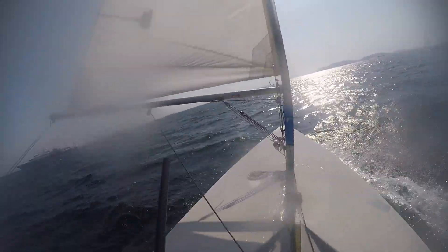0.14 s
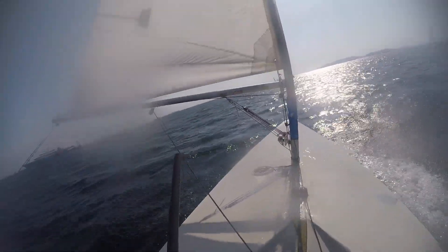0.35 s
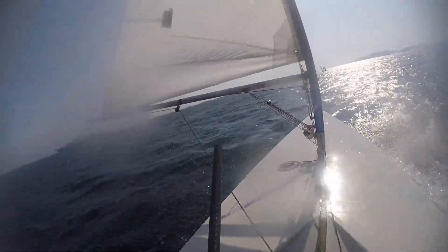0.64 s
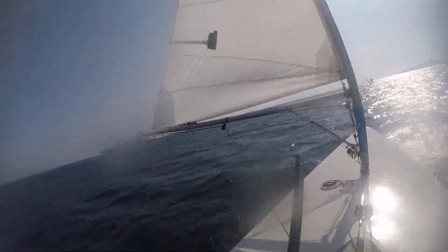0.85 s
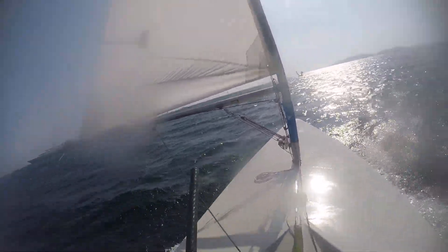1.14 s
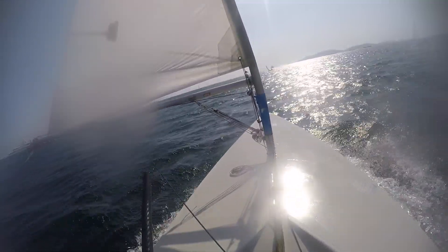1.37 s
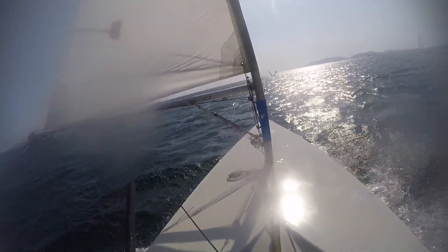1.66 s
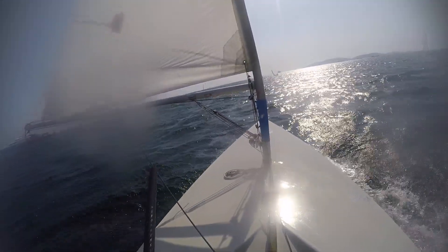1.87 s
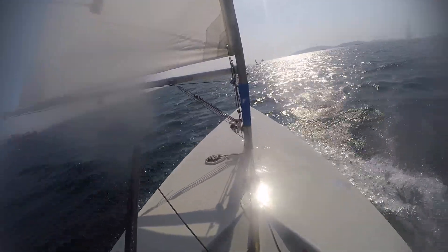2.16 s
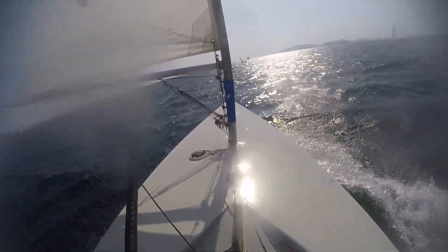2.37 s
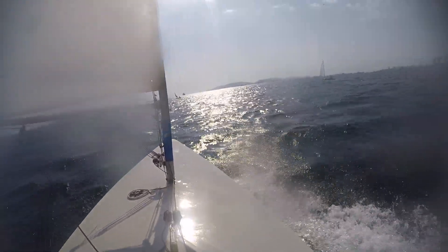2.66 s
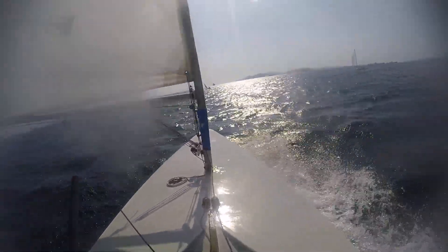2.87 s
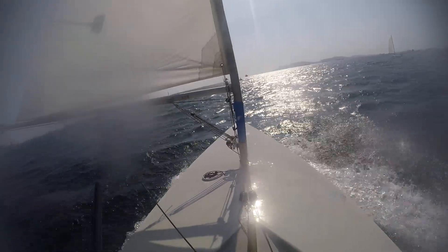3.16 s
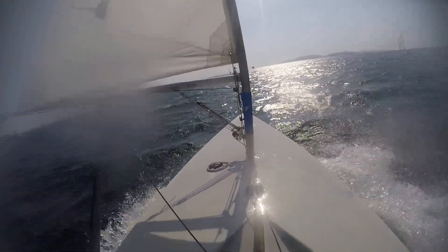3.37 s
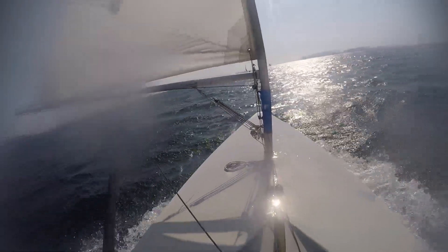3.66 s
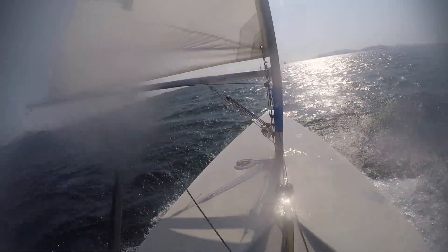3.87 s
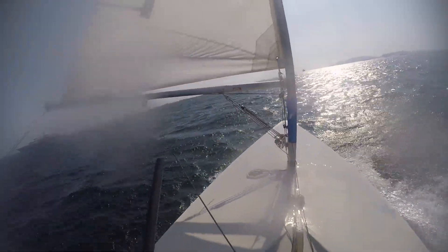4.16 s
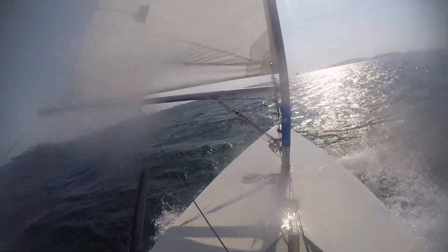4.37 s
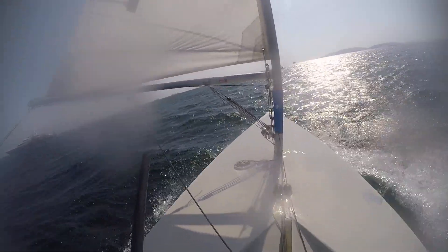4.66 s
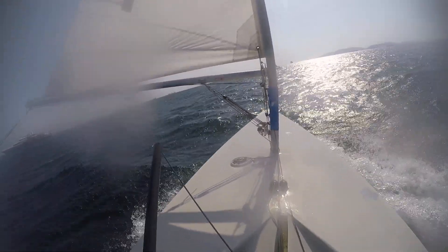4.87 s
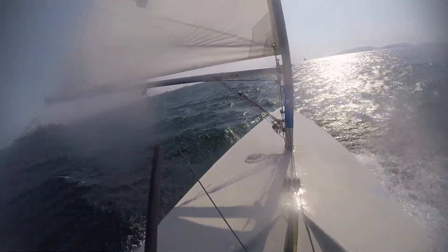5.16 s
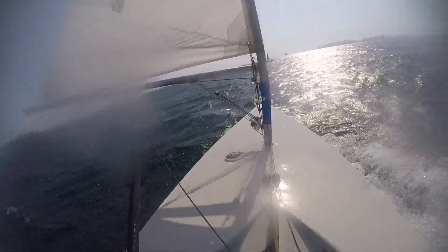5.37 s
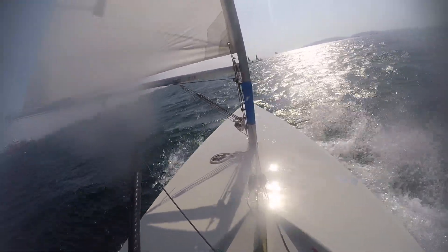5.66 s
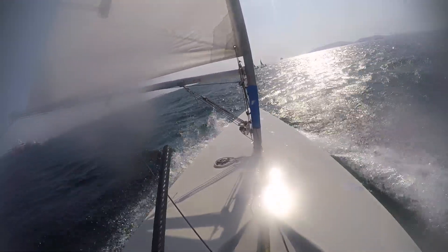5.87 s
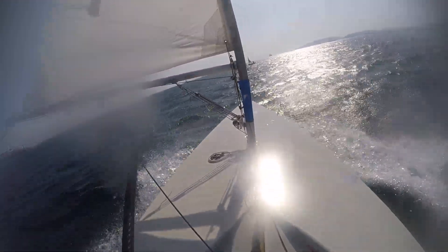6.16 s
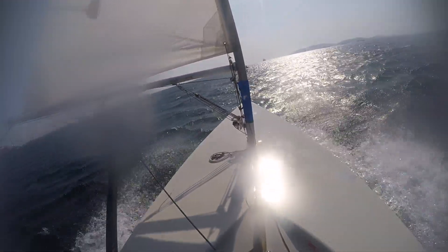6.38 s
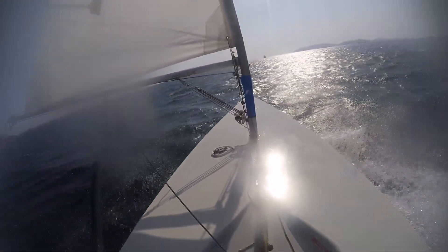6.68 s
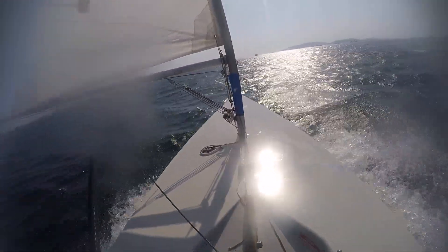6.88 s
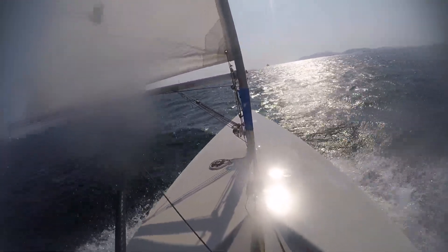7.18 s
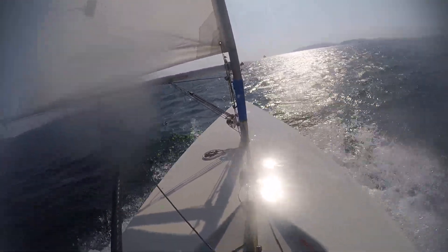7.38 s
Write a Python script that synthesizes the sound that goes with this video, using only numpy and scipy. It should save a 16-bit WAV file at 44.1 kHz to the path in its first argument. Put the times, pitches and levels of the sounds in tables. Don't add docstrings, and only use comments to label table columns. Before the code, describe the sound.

On the deck of a small sailing boat in strong wind, a ratchet block clicks rapidly for the first third of a second. Bow wave and spray then hiss on continuously, dipping around one second and swelling after three, over low drumming and gurgling at the hull. Gusts thump deeply against the microphone's sealed case, which gives the water a boxy, resonant colour, and scattered drops tick on it.

```python
import sys
import numpy as np
from scipy import signal
from scipy.fft import rfft, irfft, next_fast_len
from scipy.io import wavfile
from scipy.ndimage import uniform_filter1d

SR = 44100
rng = np.random.default_rng(int(sys.argv[2]) if len(sys.argv) > 2 else 0)


def unload_wav(signal):
    wavfile.write(
        sys.argv[1],
        SR,
        np.round(np.clip(np.atleast_2d(signal).T, -1, 1) * 32767).astype(np.int16),
    )


def to_linear_factor(level_db):
    exponent = np.asarray(level_db, float) / 20
    return 10 ** exponent


N = 332073
TIME = np.arange(N) / SR
FREQ = np.fft.rfftfreq(next_fast_len(N), 1 / SR) + 1e-3
STEPS = np.arange(0, N + 64, 64) / SR


def unit(x):
    return x / np.sqrt(np.mean(x ** 2))


def colour(x, gain):
    size = next_fast_len(N)
    return irfft(rfft(x, size) * gain, size)[..., :N]


def shape(table):
    hz, db = np.transpose(table)
    return to_linear_factor(np.interp(np.log(FREQ), np.log(hz), db))


def above(hz):
    return 1 / (1 + (hz / FREQ) ** 10)


def walk(rate):
    hold = max(int(SR / rate), 1)
    levels = np.repeat(rng.standard_normal(N // hold + 1), hold)
    return unit(uniform_filter1d(levels, hold)[:N])


def curves(table):
    s, *cols = np.transpose(table)
    return [np.interp(TIME, s, c) for c in cols]


def bumps(times, size, half_s):
    bells = np.exp(-((STEPS[:, None] - times) / half_s) ** 2)
    return np.interp(TIME, STEPS, bells @ size)


def spikes(times, size):
    x = np.zeros(N)
    at = (np.asarray(times) * SR).astype(int).clip(0, N - 1)
    np.add.at(x, at, size)
    return x


def ring(x, hz, t60):
    pole = np.exp(2j * np.pi * hz / SR - np.log(1000) / (t60 * SR))
    return signal.lfilter([1], [1, -pole], x).imag


def burst(times, db, length_s):
    tail = np.exp(-np.arange(400) / (length_s * SR))
    return np.convolve(spikes(times, to_linear_factor(db)), tail)[:N] * rng.standard_normal(N)


def pings(times, db, hz, length_s):
    after = np.arange(600) / SR
    swell = np.e * after / length_s * np.exp(-after / length_s)
    out = np.zeros(N)
    for t, gain, f in zip(times, to_linear_factor(db), hz):
        start = int(t * SR)
        out[start:start + len(after)] += gain * swell * np.sin(2 * np.pi * f * after)
    return out


def froth(grain_db, flicker_db, shared):
    level = grain_db * walk(900) + flicker_db * walk(25) + shared
    return rng.standard_normal(N) * to_linear_factor(level)


def level_db(hz, db, slope):
    # time in seconds, change of the foam in dB.
    speed = [(0.0, -0.1), (0.3, -3), (0.62, -3), (1.03, -6.5), (1.47, -1.3), (2.15, -2.7), (2.6, -1.0),
             (3.0, -0.5), (3.25, 1.2), (3.9, 2.5), (4.35, 0.4), (4.8, 1.6), (5.2, 1.2), (5.9, 2.5),
             (6.3, 2.5), (6.75, -0.1), (7.2, 2.5), (7.53, -0.2)]
    # time in seconds, half length in seconds,
    # lift (or hush) in dB, pitch in Hz.
    waves = [(0.726, 0.09, -4, 230), (1.04, 0.15, 3.5, 140), (1.31, 0.1, -4.2, 550), (1.55, 0.09, -3, 230),
             (2.367, 0.11, 4, 800), (2.666, 0.07, 2.0, 550), (3.07, 0.09, 1.5, 370), (3.39, 0.05, 3.5, 140),
             (3.51, 0.13, 1.5, 1200), (3.97, 0.024, 3, 550), (4.34, 0.09, 2.5, 1200),
             (4.46, 0.16, 2.5, 550), (4.71, 0.21, 2.5, 139), (5.506, 0.05, 3.5, 140),
             (5.78, 0.09, 2.6, 140), (6.38, 0.17, 3.2, 800), (6.516, 0.037, -3, 900),
             (6.692, 0.19, 2.5, 800), (6.91, 0.09, -1.5, 230), (7.153, 0.03, 7, 230)]
    sheets = [(0.43, 0.05, -2.1, 11500), (0.576, 0.05, 2, 3400), (0.87, 0.054, 3.5, 1800),
              (1.22, 0.05, 2, 8000), (1.485, 0.026, 3.3, 2500), (1.61, 0.05, -3, 5500),
              (1.843, 0.062, 3, 1800), (1.84, 0.05, 3.5, 11500), (2.15, 0.026, 2.5, 3400),
              (2.333, 0.05, 3, 3400), (2.53, 0.05, 1, 2500), (2.7, 0.22, 0.5, 10000),
              (2.763, 0.026, 2.5, 1800), (3.14, 0.22, 2.5, 11500), (3.444, 0.1, -1, 8000),
              (3.973, 0.068, 2.5, 2500), (4.2, 0.054, 4, 11500), (4.47, 0.054, 2.5, 8000),
              (4.465, 0.044, 4.5, 1800), (4.74, 0.1, 2, 11500), (4.82, 0.058, 1.8, 3400),
              (5.574, 0.036, 3, 5500), (5.75, 0.046, 1, 2500), (5.93, 0.1, 1, 11500),
              (6.124, 0.079, -3.5, 11500), (6.417, 0.15, 1.5, 3400), (6.5, 0.05, 1.5, 11500),
              (6.9, 0.15, 2.8, 11500), (7.446, 0.07, 6, 8000)]
    reach_octaves, force = 1.01, 0.96
    s, half_s, wave_db, wave_hz = np.transpose(waves + sheets)
    near = np.exp(-(np.log2(hz / wave_hz) / reach_octaves) ** 2)
    return db + slope * curves(speed)[0] + bumps(s, force * wave_db * near, half_s)


def case_gain():
    # resonance in Hz, width in Hz, level in dB.
    resonances = [(1054, 110, -12.5), (1198, 97, -14.5), (1551, 297, -3.5), (1848, 315, -1),
                  (2287, 560, -7), (2920, 200, -5.5), (3290, 630, 0.5), (3774, 630, -1), (4297, 100, -7),
                  (5030, 690, -8.5), (5460, 430, -10.5), (6020, 590, -10), (7000, 550, -21),
                  (7890, 820, -20), (8980, 1000, -19.5), (10230, 1300, -26.5), (11800, 500, -28),
                  (12700, 1200, -26), (13900, 1500, -30), (15100, 900, -28.5)]
    power = sum(to_linear_factor(db) ** 2 / (1 + (2 * (FREQ - hz) / w) ** 2) ** 2 for hz, w, db in resonances)
    return np.sqrt(power)


def wind():
    # time in seconds, buffet level in dB.
    gusts = [(0.0, -34), (0.84, -43.5), (1.67, -43), (2.51, -36), (3.35, -36.0), (4.18, -29.5), (5.02, -40),
             (5.86, -35.0), (6.69, -43), (7.53, -41.5)]
    # time in seconds, rise in dB.
    thumps = [(0.27, 4), (0.46, 2.5), (0.84, 4.6), (0.93, 12), (1.07, 8.5), (1.17, 9), (1.31, 5),
              (1.51, 11), (1.64, 8), (1.77, 7), (1.95, 6), (2.05, 11), (2.33, 8), (2.63, 10), (2.89, 11),
              (3.04, 6), (3.35, 3), (3.42, 3), (3.9, 1.5), (4.42, 2.5), (4.91, 0), (4.99, 2.5), (5.37, 6.2),
              (6.19, 0.5), (6.55, 4.5), (6.75, 9), (6.89, 8), (7.31, 5.7), (7.45, 5.1)]
    # time in seconds, change of level in dB.
    lulls = [(0.04, -10.9), (0.37, -16), (0.59, -7), (1.23, -7.2), (1.99, -5), (2.16, -9), (2.43, -5.2),
             (2.73, -4), (3.12, -2), (3.56, -11), (3.65, -7), (3.73, -14), (3.84, -14), (4.04, -5.5),
             (4.27, -8), (4.35, -19), (4.47, -5), (4.76, -5.6), (4.83, -18), (5.05, -14), (5.13, -6),
             (5.68, -14), (5.81, -14), (5.93, -10), (6.01, -3), (6.09, -6), (6.31, -7.8), (6.59, -2)]
    # frequency in Hz, level in dB per Hz.
    buffet = [(5.9, -42), (10, 6), (22, -3), (38, 4.5), (51, -2.5), (75, -26), (98, -59), (160, -120)]
    thump_s, lull_s = 0.027, 0.034
    eddy_hz, eddy_hz_per_db = 30.8, 0.32
    gust_db = curves(gusts)[0]
    rate = eddy_hz + eddy_hz_per_db * (gust_db + 36) + 0.907 * walk(5.4)
    gust_db = gust_db + bumps(*np.transpose(thumps), thump_s) + bumps(*np.transpose(lulls), lull_s)
    turns = np.cumsum(rate * (1.02 + 0.1406 * walk(40))) / SR
    eddies = np.sin(2 * np.pi * turns) + 0.67 * unit(colour(rng.standard_normal(N), shape(buffet)))
    size = uniform_filter1d(eddies ** 2, int(0.077 * SR))
    size = uniform_filter1d(size, int(0.019 * SR))
    pressure = eddies / np.sqrt(size + 0.24) * to_linear_factor(gust_db + 0.96 * walk(15) + 1.5)
    return colour(pressure, 1 - above(75.0))


def hull():
    # frequency in Hz, level in dB per Hz.
    skin = [(38, -40), (65, -3.5), (92, -11), (214, -16.5), (545, -18.5), (1000, -19), (1300, -65),
            (2200, -120)]
    # time in seconds, half length in seconds, pitch in Hz, level in dB.
    slaps = [
        (3.352, 0.051, 681, -52.5),
        (3.965, 0.027, 483, -59),
        (6.349, 0.09, 855, -57),
    ]
    surge = walk(30)
    body = shape(skin)
    drum = colour(froth(0.44, 0.45, 0.54 * surge), body * (1 - above(246.0)))
    wash = colour(froth(0.84, 0.28, 0.91 * surge), body * (above(224.0) - above(560.0)))
    gurgle = colour(froth(1.7, 0.53, 0.83 * surge), body * above(486.0))
    out = unit(drum) * to_linear_factor(level_db(140, -57, 0.55) + 2.3)
    out = out + unit(wash) * to_linear_factor(level_db(390, -60, 0.37) + 0.4)
    out = out + unit(gurgle) * to_linear_factor(level_db(630, -59, 0.48) + 0.2)
    for s, half_s, hz, db in slaps:
        hollow = colour(froth(2.3, 1.6, 0), 1 / (1 + ((FREQ - hz) / (0.31 * hz)) ** 2))
        out = out + unit(hollow) * to_linear_factor(db) * np.exp(-((TIME - s) / half_s) ** 2)
    return out


def water():
    splash = 0.5 * walk(70) + 0.5 * walk(22) + 1.0 * walk(300)
    case = case_gain()
    bow = colour(froth(0.55, 0.28, 0.72 * splash), case * (1 - above(2183.0)))
    foam = colour(froth(1.23, 0.4, 0.51 * splash), case * (above(2060.0) - above(4250.0)))
    mist = colour(froth(1.0, 0.49, 0.58 * splash), case * (above(4080.0) - above(6510.0)))
    spray = colour(froth(0.92, 0.48, 0.6 * splash), case * (above(6660.0) - above(9800.0)))
    fine = colour(froth(1.3, 0.51, 1.1 * splash), case * above(8600.0))
    out = unit(bow) * to_linear_factor(level_db(1660, -50, 0.56) + 0.32)
    out = out + unit(foam) * to_linear_factor(level_db(3600, -47, 0.96) + 0.14)
    out = out + unit(mist) * to_linear_factor(level_db(5200, -53, 1.1))
    out = out + unit(spray) * to_linear_factor(level_db(8000, -61.5, 1.25) + 0.78)
    return out + unit(fine) * to_linear_factor(level_db(13000, -69.5, 1.05) + 4.0)


def port():
    # time in seconds, half length in seconds,
    # sag in Hz, loss in dB.
    wet = [
        (.2, .14, 220.5, 3.0),
        (2.3, .3, 59, 3),
        (2.8, 0.24, 379.5, 1),
        (4.47, 0.079, 20.5, 2),
        (6.9, .7, -30, 2.5),
    ]
    s, half_s, sag_hz, loss_db = np.transpose(wet)
    hz = 11300 - bumps(s, sag_hz, half_s) + 45.0 * walk(4)
    turn = 2 * np.pi * np.cumsum(hz) / SR
    narrow = 1 / (1 + (FREQ / 430.) ** 2)
    a = colour(froth(1.5, .7, 0), narrow)
    b = colour(froth(1.5, .7, 0), narrow)
    carried = a * np.cos(turn) + b * np.sin(turn)
    return unit(carried) * to_linear_factor(level_db(10000, -67.5, 1.4) - bumps(s, loss_db, half_s))


def ratchet():
    # time in seconds, peak in dB, ring of the tooth in Hz.
    teeth = [(0.0124, -48, 12000), (0.0323, -45.5, 12100), (0.0464, -52, 12400), (0.0598, -47, 12100),
             (0.0722, -43, 10800), (0.0835, -47, 11000), (0.094, -49, 11000), (0.1022, -45, 12100),
             (0.1104, -49, 11200), (0.1194, -46, 11300), (0.127, -49, 10600), (0.134, -48, 11200),
             (0.1417, -47, 13100), (0.1486, -40, 13200), (0.1565, -49, 13000), (0.1613, -46, 13300),
             (0.1688, -40, 10600), (0.1763, -47, 10600), (0.1818, -45, 10700), (0.1878, -49, 12100),
             (0.208, -44, 12300), (0.2155, -44, 10500), (0.222, -48, 12300), (0.229, -50, 12100),
             (0.237, -44, 13500), (0.2444, -49, 13500), (0.2534, -47, 12400), (0.2654, -50, 11400),
             (0.2773, -49, 11300), (0.2967, -48, 12300)]
    # pitch in Hz, 60 dB decay in seconds, level in dB.
    side_rings = [
        (8730, 0.0032, 1),
        (10500, .006, -7),
        (12100, .005, -6),
        (13300, .005, -5),
    ]
    run_s, run_half_s, pawl_db, pawl_run_db = 0.12, 0.085, -62, 13.5
    load_s, cheek_db, cheek_load_db = 0.15, -53.5, 4
    tight_s, cheek_hz, tight_hz = .243, 5370, 5800
    slow_db_per_ms = 0.39
    s, peak_db, tooth_hz = np.transpose(teeth)
    chance = rng.standard_normal((len(s), 3)).T
    pawl_db = pawl_db + pawl_run_db * np.exp(-((s - run_s) / run_half_s) ** 2) + 1.5 * chance[0]
    cheek_db = cheek_db + cheek_load_db / (1 + np.exp((load_s - s) / .012)) + 1.2 * chance[1]
    cheek_hz = np.where(s < tight_s, cheek_hz, tight_hz) * (1 + .015 * chance[2])
    scrape = colour(burst(s, peak_db - 1.0, .0024), above(5600.0) - above(13900.))
    sides = sum(ring(burst(s, peak_db + db - 16.5, 0.0017), hz, t60) for hz, t60, db in side_rings)
    pawl = pings(s, pawl_db + 3.0, np.full_like(s, 7700), 0.00083)
    tooth = pings(s, peak_db - 10.0, tooth_hz, 0.00088)
    cheek = pings(s, cheek_db + 0.5, cheek_hz, .0013) * to_linear_factor(2.0 * walk(900))
    wait_ms = 1000 * np.gradient(s)
    knock = colour(burst(s, cheek_db + 10.0 + slow_db_per_ms * wait_ms, 0.0013), case_gain())
    shake = spikes(s, np.exp(-((s - .175) / 0.047) ** 2) * to_linear_factor(3.7 * rng.standard_normal(len(s))))
    deck = to_linear_factor(-45.5) * ring(shake, 113.0, 0.084) + to_linear_factor(-48.0) * ring(shake, 174.0, 0.065)
    return scrape + sides + pawl + tooth + cheek + knock + deck


def drops():
    # time in seconds, peak in dB, ring in Hz, tick in dB.
    strikes = [(1.03, -42, 5000, -61), (1.075, -42, 5110, -65), (1.1453, -42, 5460, -64),
               (1.7853, -38, 6000, -58), (1.8654, -43, 6020, -53), (2.0394, -38, 5090, -59),
               (2.159, -38, 5170, -61), (2.2767, -40, 5140, -58), (2.7294, -41, 4880, -56),
               (2.7894, -43, 5450, -57), (4.1435, -42, 5163, -49), (4.155, -40, 6000, -57),
               (5.3667, -40, 6010, -58), (5.5727, -39, 5030, -53), (6.1394, -41, 5214, -57),
               (6.3704, -32, 5140, -56), (7.3452, -44, 6010, -59)]
    # time in seconds, peak in dB, ring in Hz.
    blows = [
        (0.0124, -34, 3290),
        (0.1555, -31.5, 3800),
        (0.2803, -31, 3220),
        (0.5731, -34, 3240),
    ]
    s, peak_db, hz, tick_db = np.transpose(strikes)
    drop = pings(s, peak_db - 2.5, hz, 0.00065)
    tick = colour(burst(s, tick_db + 13.5, .0008), above(6500.) - above(13000.))
    knock = pings(*np.transpose(blows), 0.0015) * to_linear_factor(-5.0)
    return drop + tick + knock


def scene():
    return (wind() + hull() + water() + port() + ratchet() + drops())[None]


def band_limit(x):
    return signal.sosfilt(signal.butter(12, 15850, fs=SR, output="sos"), x)


def record(dry):
    mix = colour(dry, FREQ < 15290)
    return band_limit(mix)


dry = scene()
out = record(dry)
unload_wav(out)
```